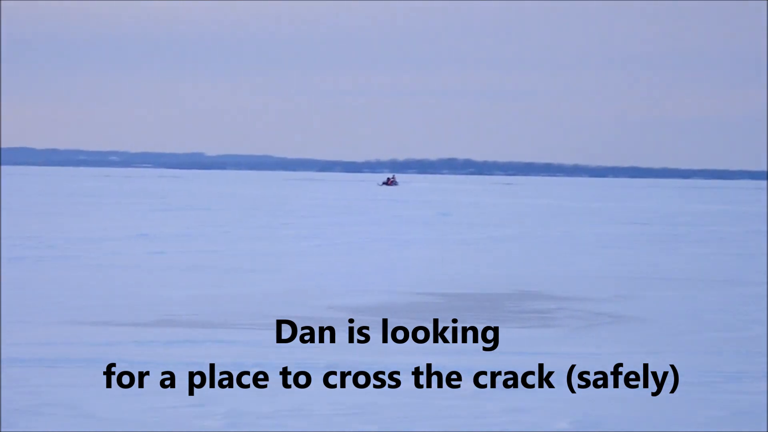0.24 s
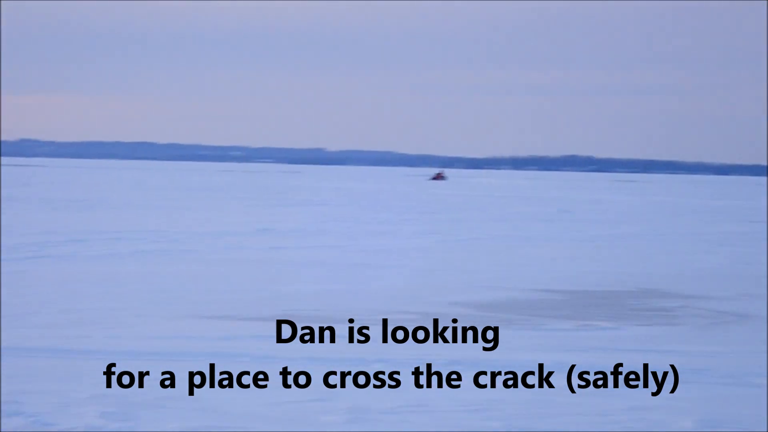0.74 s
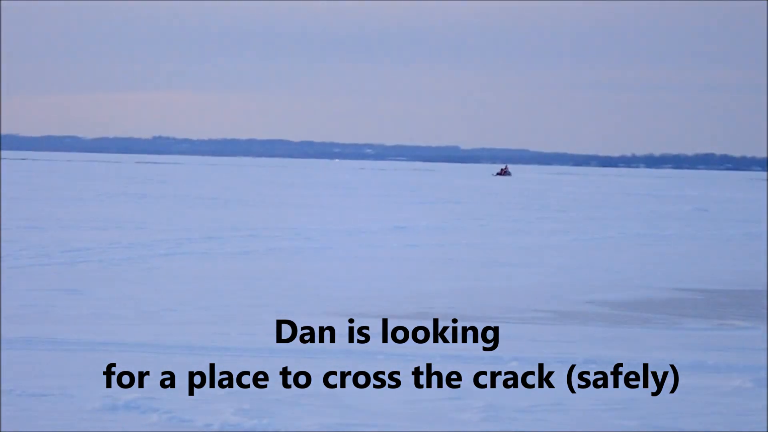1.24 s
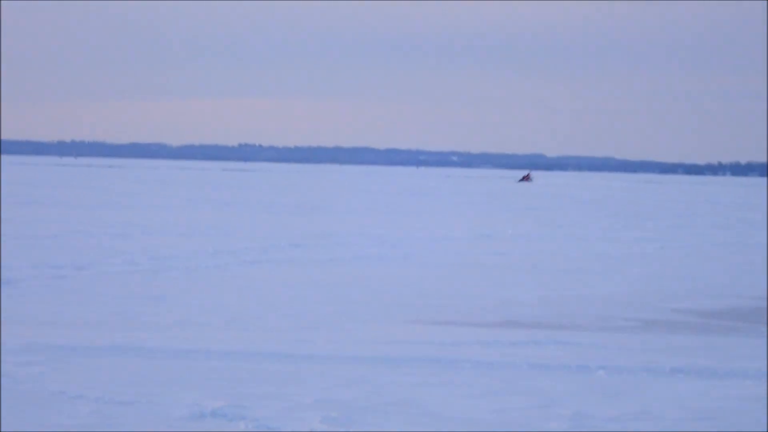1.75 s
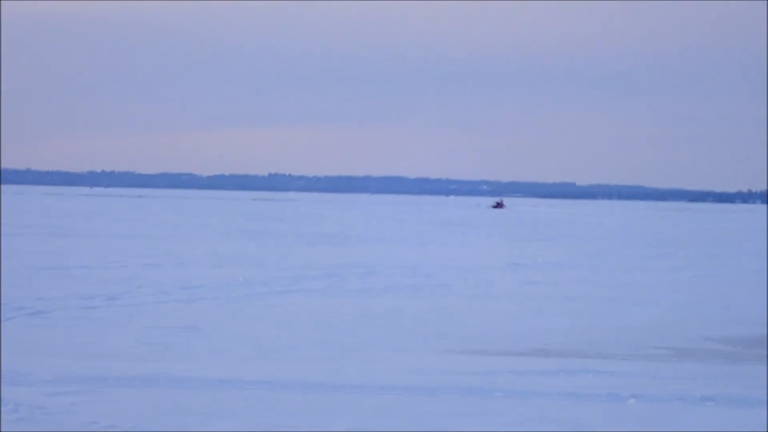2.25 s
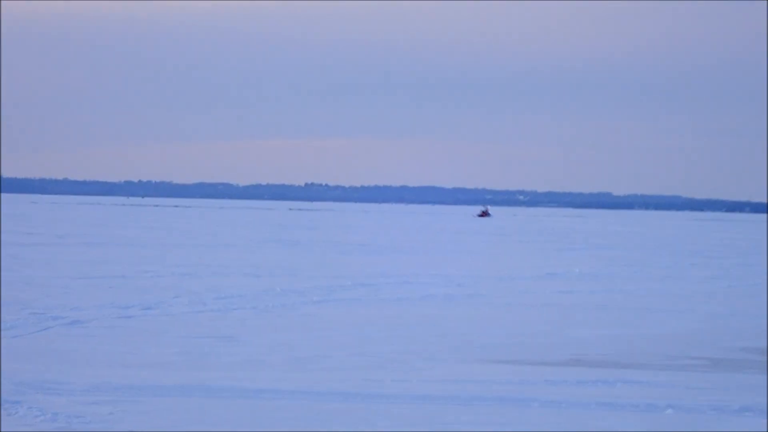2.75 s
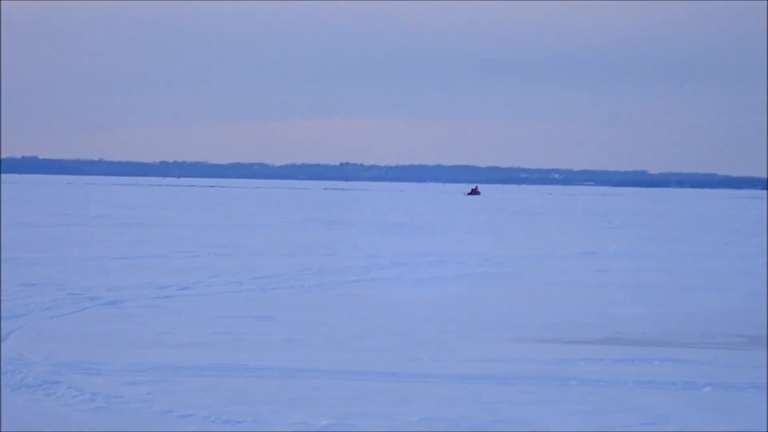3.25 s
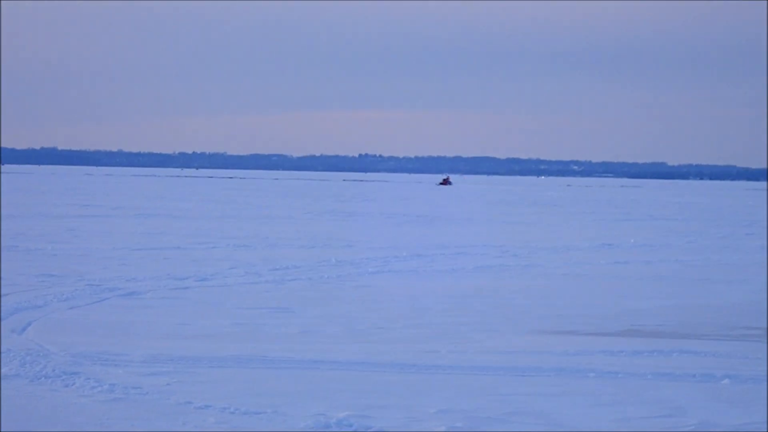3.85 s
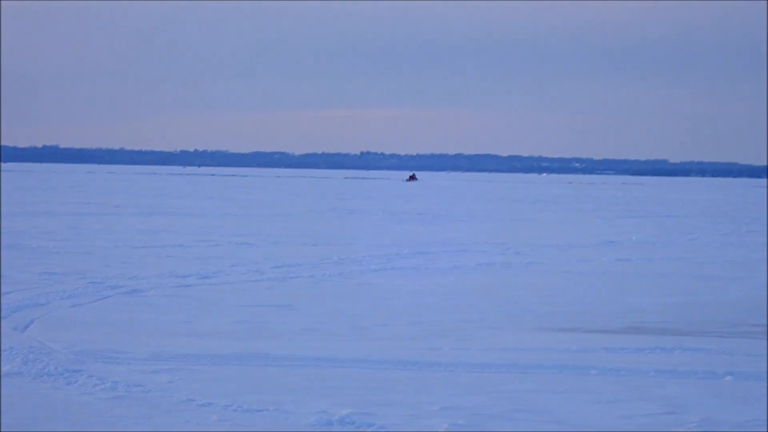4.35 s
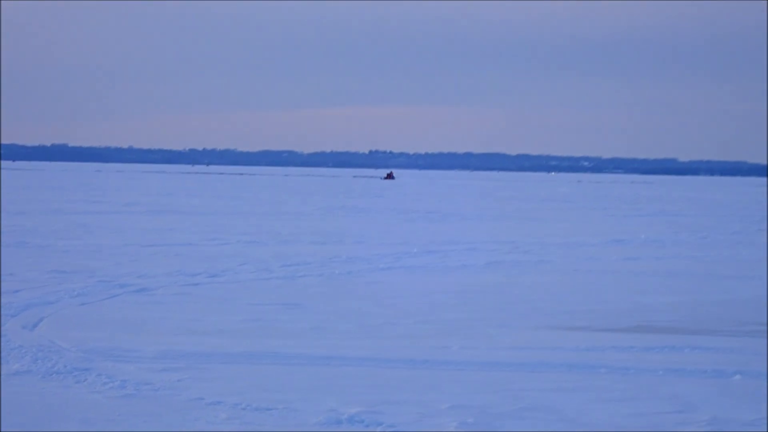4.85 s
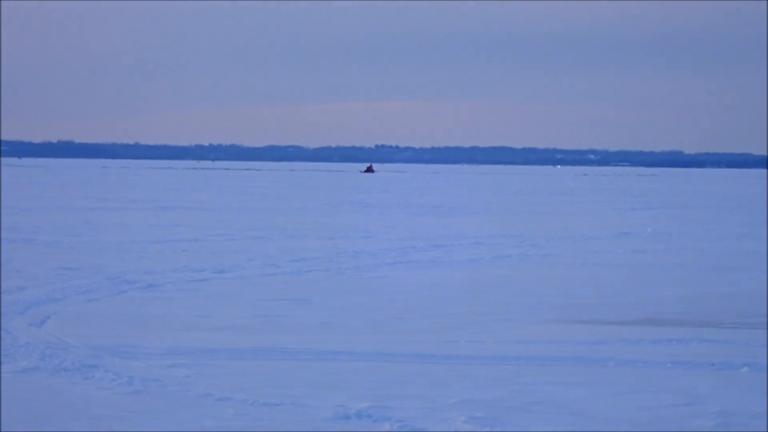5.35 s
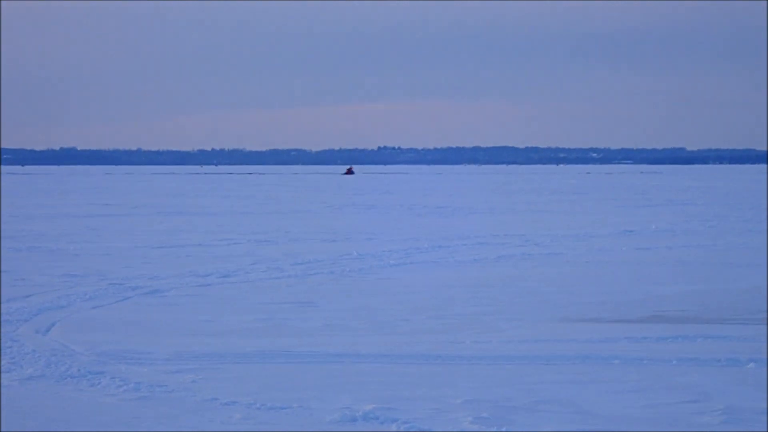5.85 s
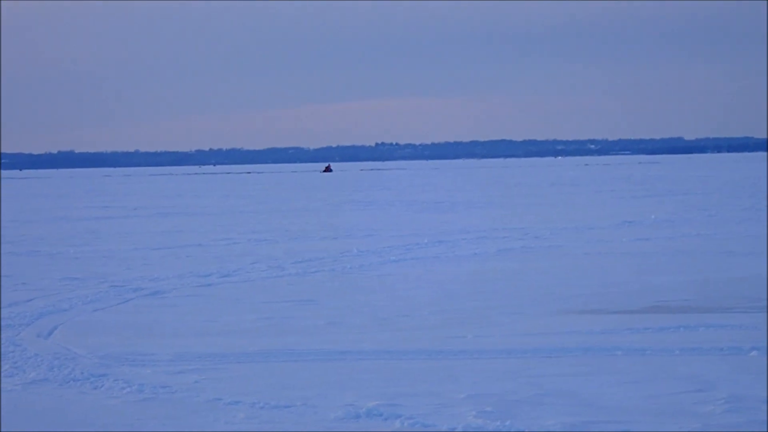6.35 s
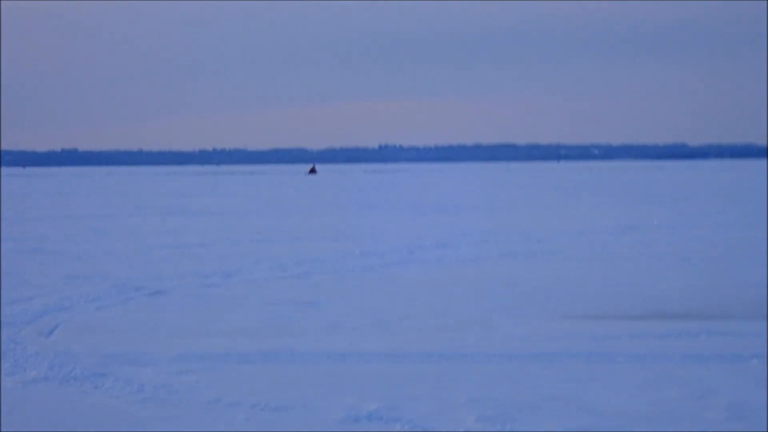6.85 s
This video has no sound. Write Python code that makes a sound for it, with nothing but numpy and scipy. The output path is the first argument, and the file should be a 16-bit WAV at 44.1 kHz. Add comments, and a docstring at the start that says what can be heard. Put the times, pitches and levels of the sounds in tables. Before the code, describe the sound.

From 0 to about 7 seconds a two-stroke snowmobile engine idles close to a stereo microphone on open lake ice, slightly left of center. About 118 exhaust strokes a second merge into a buzzing, raspy burble. Firing is uneven: muffled puffs alternate with harder bangs carrying dry, bright cracks and brief spits of gas, in crossing cadences that surge six or seven times a second. A low piston drone, hollow boom near 200 Hz and steady whirr lie underneath. Speed barely changes, edging up near 4.3 seconds, and strong bangs cluster from about 3 to 5 and after 6 seconds. Tiny sharp ticks occur singly or in short fading runs throughout. Thin hiss eases slightly by 2.5 seconds. Soft wind buffets bump the microphone between 0.2 and 0.9, near 4.1, and faintly around 6 seconds. The engine never stops or drives off.

```python
"""A three-cylinder two-stroke snowmobile idles close by on open lake ice, about 118 exhaust strokes a second.
From the start each cylinder clears burnt gas for a few turns before it catches: three cadences cross and surge.
Firings bang and crack, other strokes puff through ringing resonances; piston drone, boom and whirr lie below.
Short ticks run throughout over a thin hiss that eases in the first seconds.
A faint breeze touches the microphone, with noise buffets in the first second and again near 4 and 6 s."""
import sys
import numpy as np
from scipy import signal
from scipy.fft import rfft, irfft, next_fast_len
from scipy.io import wavfile
from scipy.ndimage import uniform_filter1d, minimum_filter1d, map_coordinates

SR = 44100
rng = np.random.default_rng(int(sys.argv[2]) if len(sys.argv) > 2 else 0)


def store_wav(level_fs):
    """Save 16-bit WAV to argv[1]."""
    pcm = np.round(np.clip(np.atleast_2d(level_fs), -1, 1) * 32767)
    wavfile.write(sys.argv[1], SR, pcm.T.astype(np.int16))


N = 312669

# Bangs, strong and weaker, that set the beat; each cylinder's other firings are spaced between them.
# Each row: time in seconds, relative bang level in dB, relative level in dB of the crack on its front.
BEAT_BANGS = [(0.0163, -6, -18), (0.0834, -5.5, -22), (0.1424, -10, -25.0), (0.1761, -11, -29),
              (0.2857, -7.5, -19), (0.5658, -7.5, -19), (0.6342, -4.5, -26), (0.668, -8.5, -31),
              (0.763, -10, -30), (0.7798, -10, -18), (1.1659, -7.5, -23.5), (1.5104, -7, -25),
              (1.578, -5.5, -19.5), (1.7212, -6.5, -22), (1.7556, -7, -20), (1.764, -9.5, -27),
              (1.9161, -7.5, -28), (2.1026, -8, -24.5), (2.3173, -3.5, -15.5), (2.4869, -5.5, -24),
              (2.716, -8, -21), (3.1004, -5, -19), (3.2018, -8, -22.0), (3.2451, -7.0, -29.0),
              (3.2612, -6.5, -18.5), (3.37, -6.5, -27), (3.387, -7.5, -24.0), (3.5642, -7.5, -24.0),
              (3.6805, -4.5, -27), (3.8136, -7, -18.5), (3.847, -7, -30.0), (3.93, -6, -22.5),
              (4.0061, -5, -24), (4.1405, -6, -21), (4.241, -6.0, -19.5), (4.459, -6, -21.0),
              (4.5172, -8.5, -15.5), (4.5588, -4.5, -20.5), (4.7266, -9.0, -24), (4.7434, -7, -16),
              (4.8945, -5, -17.5), (5.02, -8, -20), (5.1634, -6.5, -22.5), (5.2901, -7.5, -19),
              (5.6119, -6.0, -35), (5.629, -17, -21.5), (5.807, -5, -20.5), (6.194, -6, -25),
              (6.3205, -9.5, -28), (6.3378, -8, -23.5), (6.4384, -7, -21.0), (6.455, -9.5, -22),
              (6.4717, -6.5, -39), (6.5288, -6.0, -21.5), (6.5883, -5.5, -20.0), (6.6213, -10.5, -33),
              (6.713, -8.5, -21), (6.7295, -8.0, -23.5), (6.7803, -8, -21.5), (6.8556, -7, -19.0),
              (6.9222, -7.5, -25), (6.9894, -9.5, -17.5), (7.0734, -6, -25), (7.0816, -6.5, -22.0)]


def amp(db):
    """Decibels to gain."""
    return 10 ** (np.asarray(db) / 20)


def unit(x):
    """Scale to rms 1."""
    return x / np.sqrt(np.mean(x ** 2) + 1e-20)


def along(points, hz):
    """Read (Hz, value) points on a log frequency axis."""
    f, v = np.transpose(points)
    return np.interp(np.log(hz + 1), np.log(f + 1), v)


def filtered(x, response):
    """Multiply the spectrum of x by a complex response of frequency."""
    size = 2 * next_fast_len((N + SR // 2) // 2)
    hz = np.fft.rfftfreq(size, 1 / SR)
    return irfft(rfft(x, size) * response(hz), size)[..., :N]


def causal(db):
    """The minimum-phase response with these levels, which rings only after it is struck."""
    cepstrum = irfft(np.log(amp(db)))
    half = len(cepstrum) // 2
    cepstrum[1:half] *= 2
    cepstrum[half + 1:] = 0
    return np.exp(rfft(cepstrum))


def resonances(hz, modes):
    """The direct sound plus the response of damped modes (Hz, width Hz, dB over direct)."""
    return 1 + sum(amp(db) * 1j * hz * w / (f * f - hz * hz + 1j * hz * w) for f, w, db in modes)


def noise(spectrum, channels):
    """Unrelated coloured noises, scaled together to rms 1."""
    white = rng.standard_normal((channels, N))
    return unit(filtered(white, lambda hz: amp(along(spectrum, hz))))


def impulses(times, sizes):
    """One spike for each event."""
    return np.bincount(np.clip(np.round(times * SR).astype(int), 0, N - 1), sizes, N)


def dying(spikes, t60):
    """An envelope that jumps at each spike and falls 60 dB in t60 seconds."""
    decay = amp(-60 * np.arange(SR // 6) / SR / t60)
    return signal.fftconvolve(spikes, decay)[:N]


def wobble(rate):
    """A smooth random curve, rate knots a second."""
    knots = rng.standard_normal(int(N * rate / SR) + 4)
    return map_coordinates(knots, [np.arange(N) * rate / SR])


def crank():
    """Running stroke count, time of each stroke, and the strokes on which the beat-setting bangs fall."""
    # Idle speed before strokes are aligned to the bangs. Each row: time in seconds, strokes a second.
    idle_speed = [(0, 116.9), (1, 116.7), (3, 117.8), (4.3, 120), (5.5, 118.1), (6.4, 119.3)]
    t = np.arange(N) / SR
    count = np.cumsum(np.interp(t, *np.transpose(idle_speed))) / SR
    times = np.transpose(BEAT_BANGS)[0]
    free = np.interp(times, t, count)
    # whole strokes between one beat-setting bang and the next
    beat = np.cumsum(np.round(np.diff(free, prepend=0))).astype(int)
    count = count + np.interp(t, times, beat - free)
    strokes = np.interp(np.arange(int(count[-1]) + 1), count, t)
    return count, strokes, beat


def surges(strokes, surge_hz=6.6):
    """How well the exhaust scavenges: 1 on the crest of a surge about every sixth turn, -1 in its trough."""
    # Crests that the surges keep in step with. Each entry: time in seconds.
    crests = [.01, .35, .92, 1.49, 2.04, 2.48, 2.95, 3.84, 4.74, 5.65, 6.32, 6.93]
    free = surge_hz * np.array(crests)
    whole = np.cumsum(np.round(np.diff(free, prepend=0)))
    cycles = surge_hz * strokes + np.interp(strokes, crests, whole - free)
    return np.cos(2 * np.pi * cycles)


def firings(strokes, beat, surge, spread_db=1.1, surge_db=1.0,
            weak_db=-2.0, weak_crack_db=-9, crack_grows=1.0):
    """Bang and crack sizes: cylinders space firings between beat-setting bangs; surges add force and weak burns."""
    # Firing cadence. Each entry: crank turns from one firing to the next, one entry per cylinder.
    cadence_turns = [4.2, 3, 4.5]
    # An ordinary firing of each cylinder. Each row: relative bang level in dB, relative crack level in dB,
    # base chance of a weak burn on a turn between firings.
    ordinary = [(-10.5, -29.5, .2), (-7.5, -22.5, .07), (-8.5, -23.5, .07)]
    cylinders = len(ordinary)
    fires = np.zeros(len(strokes), bool)
    for cylinder, turns in enumerate(cadence_turns):
        own = beat[beat % cylinders == cylinder] // cylinders
        for first, last in zip(own, own[1:]):
            steps = max(1, round((last - first) / turns))
            fired_turns = np.round(np.linspace(first, last, steps + 1)).astype(int)
            fires[fired_turns * cylinders + cylinder] = True

    bang_db, crack_db, chance = np.array(ordinary)[np.arange(len(strokes)) % cylinders].T
    vigour_db = spread_db * np.minimum(rng.standard_normal(len(strokes)), 1)
    vigour_db = vigour_db + surge_db * surge + weak_db * ~fires
    beside = np.roll(fires, 1) | np.roll(fires, -1)  # a neighbour's firing helps a cylinder to catch
    burns = fires | (rng.random(len(strokes)) < chance * (1 + surge) * (.5 + beside))
    bang = burns * amp(bang_db + vigour_db)
    crack = burns * amp(crack_db + crack_grows * vigour_db + weak_crack_db * ~fires)
    bang[beat], crack[beat] = amp(np.transpose(BEAT_BANGS)[1:])
    return bang, crack


def exhaust(strokes, bang, surge, bang_db=25.5, puff_db=-1, puff_spread_db=4, puff_surge_db=0.5,
            late_s=0.00018, chuff_db=-42, chuff_t60=0.12):
    """Firings bang and the strokes between them puff; each pulse drags a rush of gas through the muffler."""
    # Gas rushing through the muffler. Each row: frequency in Hz, relative level in dB per Hz.
    chuff_colour = [(80, -14), (170, 7), (270, -7), (390, -12), (450, 5), (560, -2.5), (850, 2),
                    (1250, -1.5), (1450, -6.5), (1900, -14.5), (2300, -31.5), (4000, -65.5)]
    level, late = rng.standard_normal((len(strokes), 2)).T
    puff_level_db = puff_db + puff_spread_db * np.minimum(level, 2) + puff_surge_db * surge
    puffs = amp(puff_level_db) * (bang == 0)
    pulses = impulses(strokes, amp(bang_db) * bang) + impulses(strokes + late_s * late, puffs)
    chuff = amp(chuff_db) * dying(pulses, chuff_t60) * noise(chuff_colour, channels=1)[0]
    return chuff - filtered(pulses, pipe)


def pipe(hz, echo_s=.01185, echo_db=-12):
    """A pulse leaves the pipe directly, rings in its resonances and bounces up and down its length."""
    # Pressure pulse of a stroke. Each row: frequency in Hz, relative level in dB.
    pulse_colour = [(30, -32.5), (80, -6.5), (130, 2), (250, 2), (400, 0), (620, -5), (900, 0.5),
                    (1220, -2.5), (1450, -15.5), (1850, -12.5), (2300, -43.5), (4000, -70), (8000, -105)]
    # Resonances of pipe and muffler. Each row: frequency in Hz, width in Hz, level in dB over the direct pulse.
    pipe_modes = [(117.9, 3.2, 4), (150, 4.8, 15), (171.8, 8, 15.5), (202.5, 12.7, 13), (223.7, 15.5, 9.5),
                  (344.3, 90, 6), (434.7, 21.3, 11.5), (460.2, 9.5, 11), (524, 38, -0.5), (782, 15, 8),
                  (857, 62, 3), (998, 30, -15.5), (1071, 71, -2), (1243.5, 19, 8)]
    # Bands that the muffler chambers cancel. Each row: frequency in Hz, width in Hz, depth in dB.
    cancelled_bands = [(249, 15.4, -16.5), (388.3, 25.5, -16.5)]
    bounces = 1 / (1 - min(amp(echo_db), .5) * np.exp(-2j * np.pi * hz * echo_s))
    cancelled_db = sum(db / (1 + (2 * (hz - f) / w) ** 2) for f, w, db in cancelled_bands)
    return resonances(hz, pipe_modes) * bounces * causal(along(pulse_colour, hz) + cancelled_db)


def cracks(strokes, crack, crack_db=12, front_s=.0004, bounce_s=0.0027, bounce_db=-12,
           spit_db=-12, spit_side_db=-6, spit_t60=0.054):
    """A steep front ends a bang's first swing, rings the pipe's mouth, bounces off the ice and spits gas."""
    # Steep front of a bang. Each row: frequency in Hz, relative level in dB.
    front_colour = [(600, -7), (1500, -6), (2100, 0.5), (2700, 7), (3100, 2), (3750, 6), (4250, -6),
                    (4900, -7.5), (7000, -35), (11000, -71)]
    # Ring of the pipe's mouth. Each row: frequency in Hz, width in Hz, level in dB over the direct crack.
    mouth_modes = [(3330, 120, -8), (3840, 155, -2)]
    # Turbulent gas behind a bang. Each row: frequency in Hz, relative level in dB per Hz.
    spit_colour = [(1000, 2), (2000, 7.5), (3000, -5), (3800, 0.5), (4500, -11), (5400, -11.5), (6300, -3),
                   (8000, -18), (10000, -38), (14000, -60)]
    fronts = impulses(strokes + front_s, crack)
    bounced = impulses(strokes + front_s + bounce_s, amp(bounce_db) * crack)
    # gas shared by both ports, plus a part of its own at each
    gas = noise(spit_colour, channels=1) + amp(spit_side_db) * noise(spit_colour, channels=2)
    spit = amp(spit_db) * dying(fronts, spit_t60) * gas

    def mouth(hz):
        """Colour of the front and the ring of the pipe's mouth."""
        return resonances(hz, mouth_modes) * causal(along(front_colour, hz))

    return spit + amp(crack_db) * filtered(fronts + bounced, mouth)


def scatter(x):
    """Hood and chassis return a short diffuse tail, different at each microphone port."""
    # Decay of the scattered sound. Each row: frequency in Hz, time in seconds to fall 60 dB.
    scatter_decay = [(200, 0.018), (1000, 0.04), (2000, 0.099), (4000, 0.089), (9000, 0.035)]
    hz, t, z = signal.stft(rng.standard_normal((2, SR // 6)), SR, nperseg=128)
    decay = amp(-60 * t / along(scatter_decay, hz)[:, None])
    tail = signal.istft(z * decay, SR, nperseg=128)[1]
    tail = tail / np.linalg.norm(tail, axis=1, keepdims=True)
    return signal.fftconvolve(x, tail, axes=1)[:, :N]


def drone(count, first_db=-40, second_db=-27, third_db=-39, throb_db=3.0):
    """The pistons pump air on every stroke, fired or not: low orders that throb a little."""
    orders = 0
    for k, db in enumerate([first_db, second_db, third_db], 1):
        orders = orders + np.sqrt(2) * amp(db) * np.cos(2 * np.pi * k * count)
    return -orders * amp(throb_db * wobble(30))


def boom(boom_hz=197, boom_db=-24.0, wander=1.0, throb_db=2.5):
    """A hollow resonance of the machine hums, unsteady in phase and strength."""
    drift = wander * (wobble(3.7) + wobble(26))  # radians
    phase = 2 * np.pi * boom_hz * np.arange(N) / SR + drift
    return np.sqrt(2) * amp(boom_db + throb_db * wobble(35)) * np.sin(phase)


def whirr(whirr_db=-30.0):
    """Fan, clutch and cylinders whirr as steady coloured noise."""
    # Colour of the whirr. Each row: frequency in Hz, relative level in dB per Hz.
    whirr_colour = [(30, -29), (70, 0.5), (160, 10), (300, 4), (900, 3), (1300, -12.5), (1850, -27),
                    (2300, -28), (3800, -29), (5000, -49)]
    return amp(whirr_db) * noise(whirr_colour, channels=1)


def ticks(tick_db=11, fade_db=4.5, gap_s=1 / 14.985):
    """Very short bright ticks at both ports at once, in evenly spaced runs that fade."""
    # Runs of ticks. Each row: start in seconds, relative level of the first in dB, number of ticks.
    tick_runs = [(0.2348, -34, 1), (0.7354, -32, 1), (0.869, -25, 1), (1.0024, -24.5, 1), (1.236, -29.5, 2),
                 (1.3692, -28, 1), (1.5699, -17.5, 1), (1.8706, -25, 1), (2.1372, -32, 1),
                 (2.3715, -31.5, 2), (2.571, -23, 2), (3.072, -28.5, 3), (3.5055, -24.5, 3),
                 (4.2063, -33, 2), (4.707, -25.5, 3), (4.9072, -23.5, 1), (5.1408, -29, 2),
                 (5.3413, -25.5, 1), (5.9085, -28, 2), (6.2756, -29.5, 2), (6.4758, -27, 1),
                 (6.9764, -30.5, 1)]
    events = [(s + k * gap_s, db - k * fade_db) for s, db, count in tick_runs for k in range(round(count))]
    s, db = np.transpose(events)
    bright = [(1000, 6), (6000, 4.0), (15000, 2.0)]  # Hz, relative dB
    return filtered(impulses(s, amp(db + tick_db)), lambda hz: amp(along(bright, hz)))


def wind(breeze_db=-52, swell_db=3, gust_s=0.017):
    """A faint uneven breeze with short bell-shaped buffets, its noise unrelated at the two ports."""
    # Wind buffets. Each row: time of the peak in seconds, peak gain in dB, added to the breeze.
    buffets = [(.2, -28.5), (.55, -24), (.7, -24), (.86, -24), (4.08, -23), (4.2, -22.5), (5.94, -28.5),
               (6.22, -33)]
    # Colour of moving air at the microphone. Each row: frequency in Hz, relative level in dB per Hz.
    wind_colour = [(15, -22), (40, -7), (75, 17), (130, 17), (300, -45), (800, -63)]
    t = np.arange(N) / SR
    gusts = sum(amp(db) * np.exp(-.5 * ((t - s) / gust_s) ** 2) for s, db in buffets)
    breeze = amp(breeze_db + swell_db * wobble(9.8))
    return (breeze + gusts) * noise(wind_colour, channels=2)


def hiss(waver_db=0.8):
    """A thin coloured noise that eases off a little and wavers, unrelated at the two ports."""
    # Mean course of the hiss. Each row: time in seconds, level in dB.
    hiss_course = [(0, -48.5), (1.5, -49.5), (2.5, -50.5), (7, -50)]
    # Colour of the hiss. Each row: frequency in Hz, relative level in dB per Hz.
    hiss_colour = [(1000, 4.5), (3000, -17), (3800, -2), (4800, -5), (5500, -1.5), (5920, 6), (6150, -1),
                   (6400, 5.5), (7400, -3.5), (8700, 1.5), (10500, -10.5), (16000, -19)]
    level_db = np.interp(np.arange(N) / SR, *np.transpose(hiss_course))
    return amp(level_db + waver_db * wobble(12)) * noise(hiss_colour, channels=2)


def scene(scatter_db=-22, left_db=0.67, jitter_s=.00025):
    """The engine stands slightly to the left: louder there, and one sample earlier."""
    count, strokes, beat = crank()
    surge = surges(strokes)
    bang, crack = firings(strokes, beat, surge)
    late = jitter_s * rng.standard_normal(len(strokes))
    late[beat] = 0  # the beat-setting bangs keep their times
    engine = exhaust(strokes + late, bang, surge) + cracks(strokes + late, crack)
    engine = engine + amp(scatter_db) * scatter(engine)
    left, right = engine + drone(count) + boom() + whirr()
    machine = np.array([left, np.roll(right, 1)])
    balance = amp([[left_db], [-left_db]])
    return (machine + wind() + hiss() + ticks()) * balance


def record(dry, low_cut_hz=40, top_hz=16300):
    """The recorder thins the deepest bass, ducks the highest peaks and keeps nothing above its band limit."""
    thinned = filtered(dry, lambda hz: hz ** 2 / np.hypot(hz ** 2, low_cut_hz ** 2))
    allowed = np.minimum(1, .93 / (np.abs(thinned).max(axis=0) + 1e-9))
    # one gain for both channels, eased within 128 samples on either side of a peak
    gain = uniform_filter1d(minimum_filter1d(allowed, size=129), size=129)
    return filtered(thinned * gain, lambda hz: hz < top_hz)


dry = scene()
out = record(dry)
store_wav(out)
```